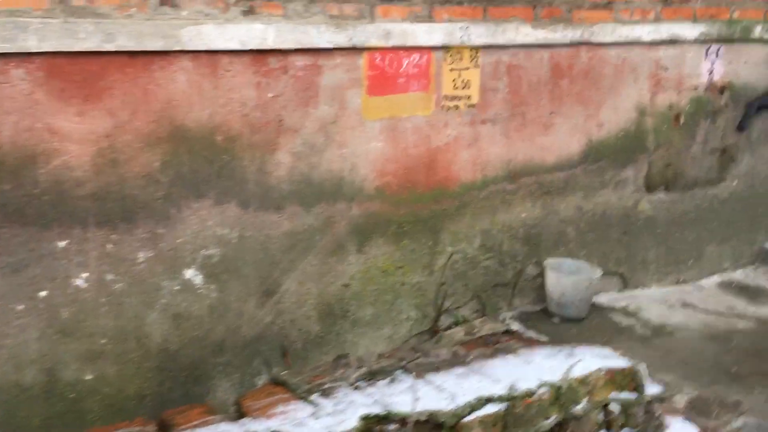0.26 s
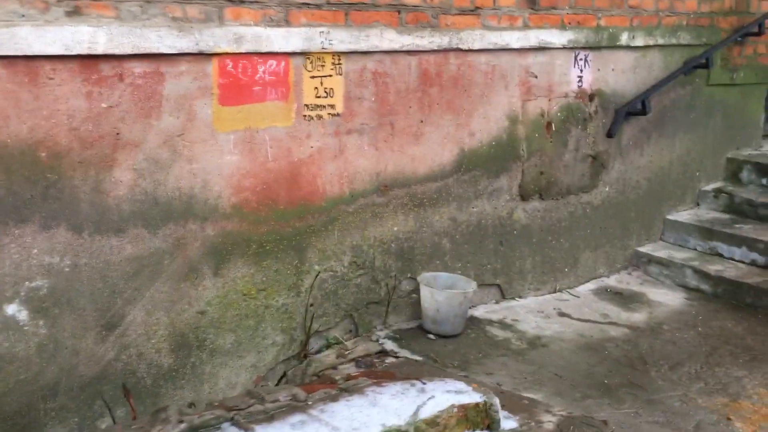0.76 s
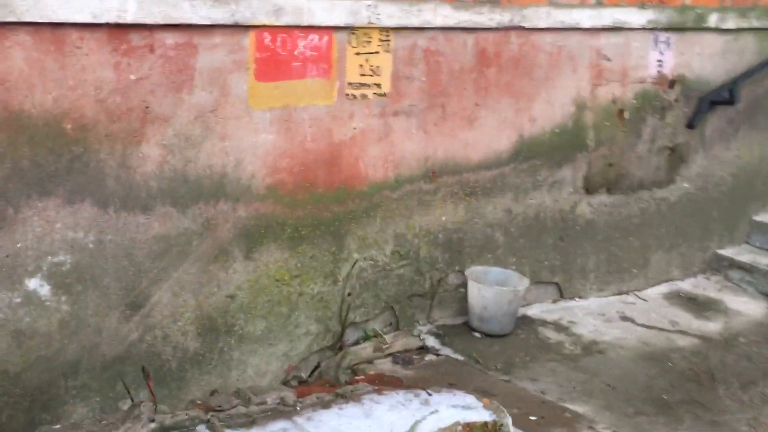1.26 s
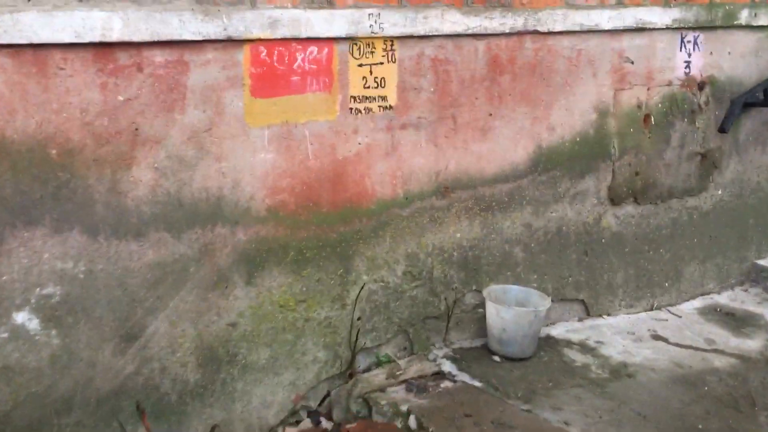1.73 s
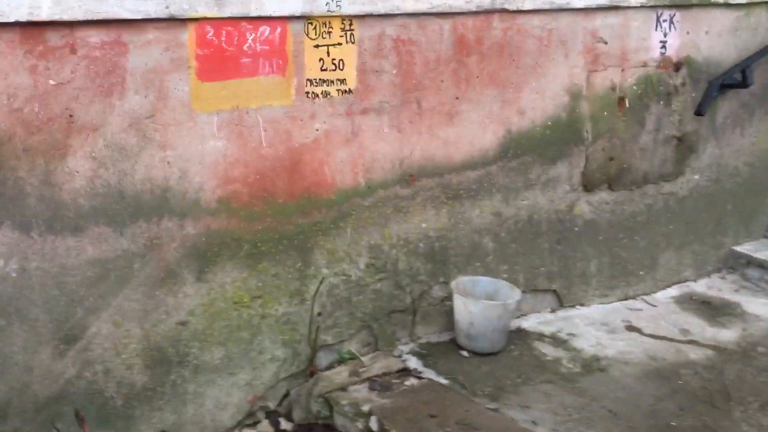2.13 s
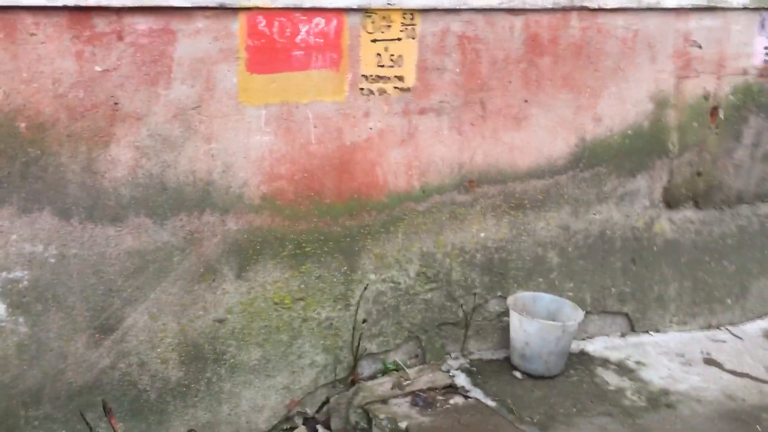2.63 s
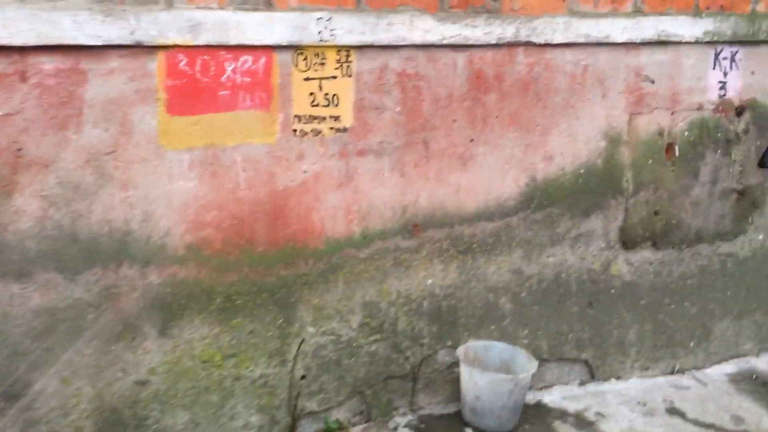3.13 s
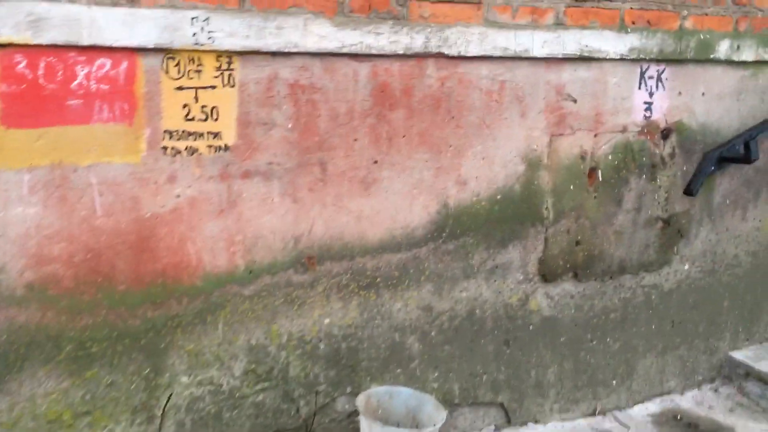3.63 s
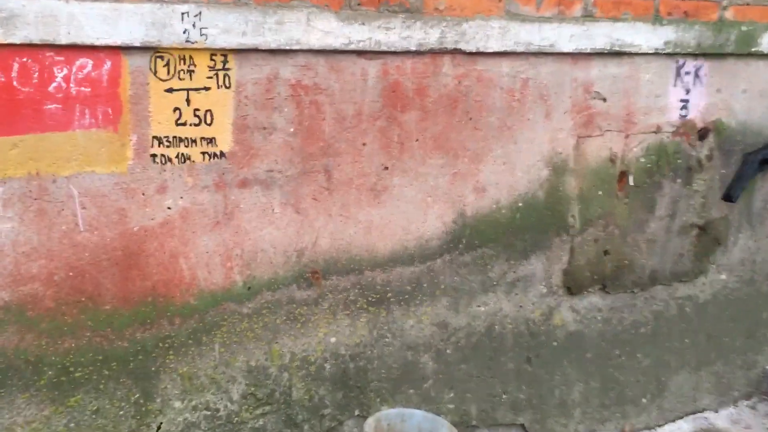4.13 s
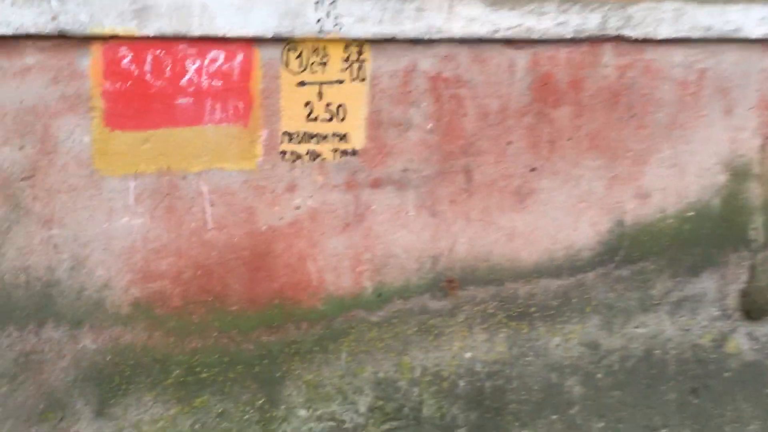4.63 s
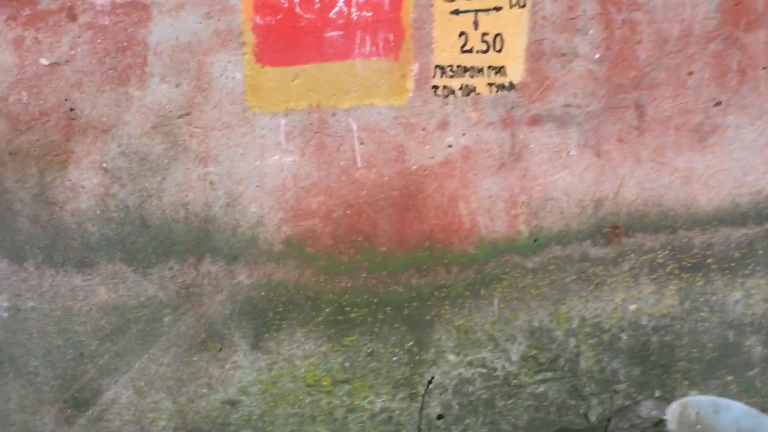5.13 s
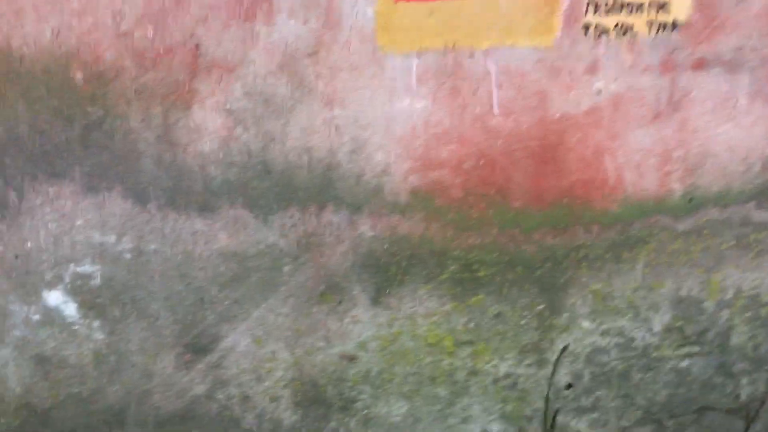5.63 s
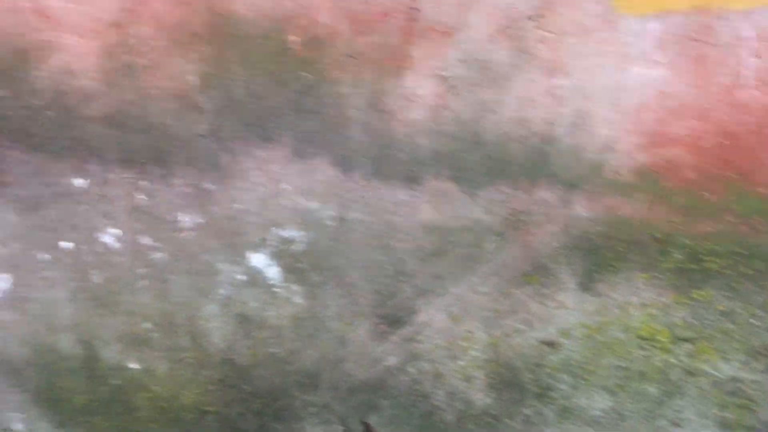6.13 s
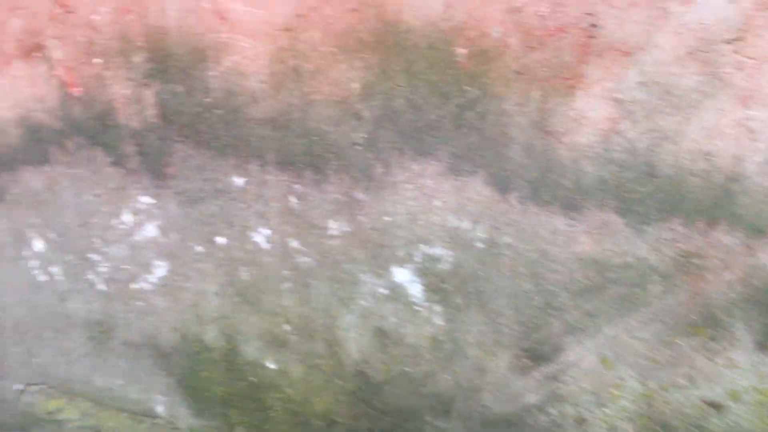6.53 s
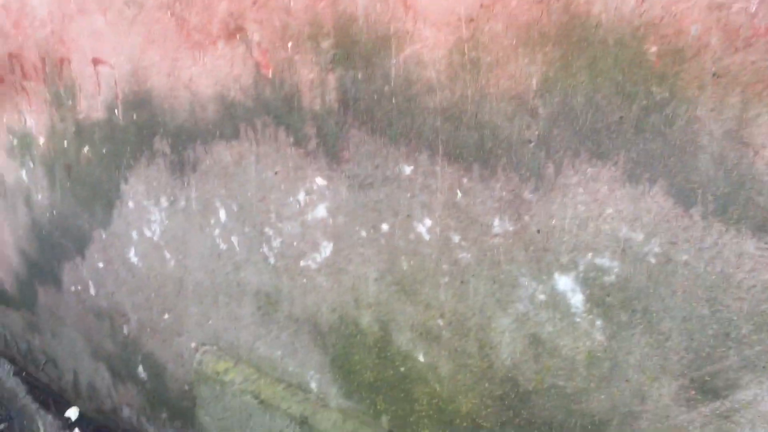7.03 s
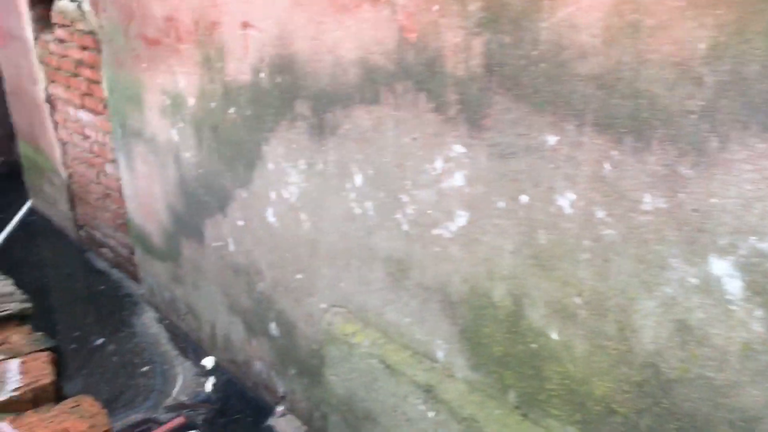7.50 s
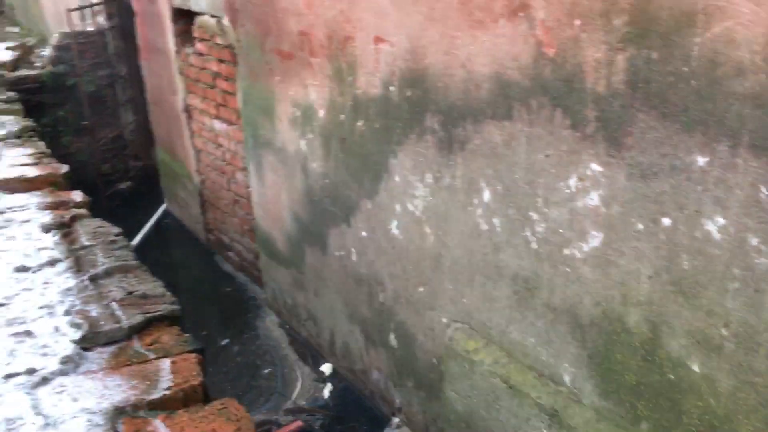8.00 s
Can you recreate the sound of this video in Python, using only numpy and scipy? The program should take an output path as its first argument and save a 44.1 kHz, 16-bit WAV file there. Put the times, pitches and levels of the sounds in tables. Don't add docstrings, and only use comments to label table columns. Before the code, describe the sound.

Close to a handheld microphone in a walled yard, boots shift on crusted snow with small dry snaps and faint scuffs. After a near pause, several firm steps crunch, with dull packed thuds and grainy crumbling. A heavy final step gives way in stages, then only tiny crumbs settle. Distant traffic rumble, faint machine hum and microphone hiss continue throughout.

```python
import sys
import numpy as np
from scipy import signal
from scipy.fft import rfft, irfft
from scipy.io import wavfile
from scipy.ndimage import uniform_filter1d

SR = 44100
rng = np.random.default_rng(int(sys.argv[2]) if len(sys.argv) > 2 else 0)


def boost(x):
    u = np.asarray(x, float) / 20
    return 10 ** u


def master_out(mix):
    frames = np.transpose(np.atleast_2d(mix))
    ceiling = np.clip(frames, -1, 1)
    pcm = np.round(ceiling * 32767).astype(np.int16)
    wavfile.write(sys.argv[1], SR, pcm)


N = 364266

CRYSTAL_HZ = np.geomspace(110, 15000, 22)

# peak time in
# seconds, peak level in dB, pitch in Hz, sharp edge in dB relative to the peak.
SHIFT_SNAPS = [(0.229, -38.5, 2450, -6), (0.246, -42, 1220, -25), (0.521, -25.5, 1390, -14.5),
               (0.5525, -33, 1350, -18), (0.602, -50, 3600, -25), (0.667, -45.5, 3130, -32),
               (0.717, -23, 1360, -12.5), (0.8252, -52, 3520, -12), (0.8436, -41, 3940, -20),
               (0.8549, -23.5, 1760, -25), (0.9355, -32, 1840, -28), (1.184, -56, 2460, 9.5),
               (1.2452, -50, 3580, -8), (1.6984, -48, 695, 2.5), (1.8205, -33, 1050, -9.5),
               (1.8406, -45, 2070, 2), (1.8598, -40.5, 1450, 4.5), (2.0961, -46, 3260, -2),
               (2.1192, -42.5, 3800, -2), (2.2832, -47, 1670, 0), (2.3287, -42, 4070, -15),
               (2.3657, -51, 2100, 13.5), (2.3916, -45, 3540, -12), (2.5646, -38.5, 4500, -11),
               (2.5793, -42, 4250, -18), (2.6043, -43, 3400, -23), (2.6329, -44, 2450, -25),
               (2.673, -35.5, 2340, 0.5), (2.7057, -44, 1980, -21)]
STEP_SNAPS = [(3.194, -29, 1110, 0), (3.2178, -23.5, 630, -1), (3.348, -34.5, 740, -25),
              (3.3988, -22, 760, -24), (3.4222, -29, 1460, 0.5), (3.484, -33.5, 1660, -1),
              (3.5141, -23.5, 787, -9), (3.541, -34, 1070, 2), (3.63, -33, 1100, -3),
              (3.6645, -40.5, 4000, -27), (3.679, -36.5, 1160, -5), (3.975, -48, 3270, -21),
              (4.078, -34.5, 2290, 5), (4.109, -36, 1110, 4), (4.1216, -32, 2940, -13), (4.2, -25, 1320, 4),
              (4.235, -26.5, 1970, -8), (4.351, -38.5, 785, 8.5), (4.3764, -35.5, 1320, 2),
              (4.4406, -42, 1690, 7), (4.4659, -33, 1610, 1), (4.481, -30, 1420, -1),
              (4.4967, -30.5, 2100, -6.5), (4.532, -38, 1140, 2), (4.5396, -32, 616, 2),
              (4.5855, -28.5, 1140, 3.5), (4.632, -31, 1020, 4), (4.6665, -25, 3240, -3),
              (4.7136, -26, 980, 4), (4.7431, -30.5, 640, 3)]
TURN_SNAPS = [(4.938, -36, 2350, -3), (5.175, -45, 3460, -15), (5.2051, -32.5, 1030, -10),
              (5.2212, -32, 1520, -2), (5.282, -34.5, 1050, 6.5), (5.394, -31, 1180, 0),
              (5.4114, -22, 800, -2), (5.4323, -28.5, 1150, -27), (5.4481, -29, 1380, -2),
              (5.4919, -24, 1080, -25), (5.5574, -36, 2090, 2), (5.577, -31.5, 2280, -22),
              (5.6416, -34, 1470, -13), (5.753, -44.5, 1950, 2), (5.955, -34.5, 1750, -3),
              (6.0565, -29, 1510, -27), (6.1224, -43, 1410, 7), (6.295, -25, 1270, -7),
              (6.406, -22, 1140, -20), (6.575, -21.5, 920, -11), (6.6368, -28.5, 2260, 4),
              (6.6964, -26.5, 1860, -20), (6.7276, -21, 595, -14), (6.7602, -23.5, 740, 1.5),
              (6.934, -41.5, 1080, 3), (7.0595, -43, 2200, 5), (7.124, -44.5, 1770, 7),
              (7.2405, -50.5, 2040, 9), (7.312, -51, 1970, 5.5), (7.4189, -31, 2710, 5.5)]
MORE_SNAPS = [(1.2583, -44, 6900, 2), (4.777, -31, 6130, 5.5), (4.9003, -43, 11900, -19),
                   (5.0295, -36, 13300, -17), (5.0451, -34, 12500, -20), (5.138, -40.5, 12660, -18),
                   (5.714, -39, 2860, 7.5), (5.8008, -37, 13800, -6), (6.038, -31, 12700, -21),
                   (6.281, -46.5, 6700, 12), (6.9796, -42, 11800, 1), (7.037, -43, 12500, -18),
                   (7.166, -47, 11000, -4), (0.9, -45, 3380, -12), (1.01, -48.5, 1440, 2),
                   (0.922, -44, 1400, -16), (2.252, -50, 2470, 5), (2.82, -51, 2520, -15), (4.729, -29, 770, 5),
                   (5.3855, -42, 1470, -4), (6.177, -46.5, 2170, 4), (7.349, -53, 2420, -14),
                   (0.2927, -64, 705, -5), (0.3122, -49, 1450, -6), (0.737, -48, 1130, 8), (0.989, -52, 1100, -9),
              (1.447, -48, 1000, -12), (1.7996, -46.5, 2030, -11), (2.415, -56, 3500, 3),
              (2.5517, -44, 2050, -6), (2.5557, -42, 4200, -9), (3.2152, -31, 1880, -2), (3.2309, -24, 740, -4),
              (3.2377, -29, 1500, -14), (3.2627, -34, 700, 2), (3.268, -36.5, 736, -8), (3.3942, -38, 734, -15),
              (3.4138, -34, 1390, 3), (3.5452, -34.5, 895, -1.5), (3.587, -46, 1400, -2),
              (3.6022, -52, 1080, -8), (3.36, -34.5, 1000, -7), (3.6868, -44, 1970, 8), (4.517, -40, 2000, -11),
              (3.7373, -44, 1680, 1), (3.7765, -49, 1970, -14), (3.9584, -49, 2180, 7.5),
              (4.0982, -38.5, 740, -14), (4.124, -31.5, 750, -20), (4.144, -48, 900, 3),
              (4.187, -27.5, 2570, -13), (4.2559, -34, 710, -6), (4.2913, -41, 1660, -11),
              (4.3596, -42, 1040, -7), (4.5107, -41, 1040, -2), (4.603, -41, 1770, -7), (4.66, -31, 3000, -13),
              (4.7173, -27, 750, 1), (4.7586, -35, 937, -9), (4.792, -33.5, 900, -13), (4.8016, -35, 3270, 6),
              (4.823, -41.5, 1940, -7),
                   (4.896, -48, 3520, -11), (4.946, -40, 2110, -12), (5.039, -37, 1990, 0),
                   (5.059, -36, 1920, -12), (5.074, -35, 1400, -13), (5.0873, -34, 950, -21),
                   (5.0994, -37, 1300, -11), (5.1484, -45, 875, 0), (5.186, -41.5, 1010, 4),
                   (5.2895, -40, 1040, -13), (5.2974, -44, 1530, -13), (5.3695, -45, 1310, -18),
                   (5.424, -44, 1010, -11), (5.47, -33, 1010, -9), (5.5022, -31, 1000, -6),
                   (5.512, -36, 1370, -11), (5.5834, -28.5, 1490, -11), (5.5964, -41, 930, -12),
                   (5.652, -37, 1170, 3), (5.681, -43, 1700, -9), (5.706, -43, 1500, 1),
                   (5.7155, -43, 720, -14), (5.855, -52.5, 2250, 1), (6.0383, -44, 1310, -5),
                   (6.0705, -37, 1500, -7), (6.076, -43, 5930, 6), (6.1829, -48, 2800, 0),
                   (6.3012, -33.5, 560, 3), (6.3102, -37, 1050, -12), (6.388, -34, 1750, -11),
                   (6.3735, -37, 1070, -9), (6.4853, -31.5, 1040, -12), (6.5752, -25, 3760, -19),
                   (6.6, -39, 875, -16), (6.625, -28, 860, -11), (6.6655, -31, 910, -5), (6.711, -24, 716, -7),
                   (6.7828, -36, 1490, -11), (6.8059, -29, 1320, -2), (6.812, -46, 1320, -5),
                   (6.8673, -40, 1270, -2), (6.899, -41, 1730, -11), (6.9442, -38, 1980, -9),
                   (6.9756, -44, 1980, -5), (7.1115, -49, 1570, -6), (7.4394, -63, 2200, -9),
                   (7.4597, -59, 1250, 9),
                   (1.0268, -50, 8500, -6), (1.511, -50, 11700, -5), (2.5794, -44, 13500, -8),
                 (5.204, -42.5, 6450, -8), (5.312, -45, 13200, -4), (5.364, -50, 12200, -10),
                 (5.4613, -33, 11400, -8), (5.5904, -58, 6310, -10), (5.877, -54, 10800, -6),
                 (6.056, -35, 14300, 4), (6.061, -42, 9200, 10), (6.9436, -59, 6200, -5),
                 (7.3796, -57, 13900, -4)]
SNAPS = SHIFT_SNAPS + STEP_SNAPS + TURN_SNAPS + MORE_SNAPS


def evened(x):
    return x / np.sqrt(np.mean(x ** 2) + 1e-20)


def read(points, hz):
    f, db = np.transpose(points)
    return np.interp(np.log(hz + 1), np.log(f), db)


def noise(points):
    hz = np.fft.rfftfreq(N, 1 / SR)
    gain = boost(read(points, hz)) * (hz > points[0][0])
    return evened(irfft(rfft(rng.standard_normal(N)) * gain, N))


def add(mix, start_s, sound):
    part = mix[max(round(start_s * SR), 0):][:len(sound)]
    part += sound[:len(part)]


def fading(x, decay_s):
    return signal.lfilter([1], [1, -np.exp(-1 / (max(decay_s, 1e-4) * SR))], x)


def pop(hz, turns, sag=0):
    u = np.arange(int(4 * turns * SR / hz)) * hz / SR / turns
    envelope = u ** 3 * np.exp(-4.5 * u)
    phase = u + sag * (1 - np.exp(-2 * u) - u / 2)
    swing = envelope * np.sin(2 * np.pi * turns * phase)
    return swing / abs(swing).max()


def near(hz, octaves):
    share = np.exp(-.5 * (np.log2(CRYSTAL_HZ[:, None] / hz) / octaves) ** 2)
    return share / np.sqrt((share ** 2).sum(0))


def around(s, length_s):
    at = np.arange(max(round((s - .15) * SR), 0), min(round((s + length_s + .45) * SR), N))
    return slice(at[0], at[-1] + 1), at / SR - s


def traffic():
    # time in seconds, nearness in dB, heavy engine load in dB.
    swells = [(0, 2, 3), (.4, 4.5, -2.5), (.9, 2, 0.5), (1.3, 3, 4.5), (2.0, 8.5, -4.5), (2.8, 8, -1.5),
              (3.3, -3, -3.5), (3.6, 8, -10), (4.1, 7.5, -10), (4.7, -6, -5), (5.1, 7.5, -8.5),
              (5.9, 1.5, -3), (6.3, 4, -2), (6.7, -11, -7), (7.2, -0.5, -3), (7.7, -0.5, -3),
              (8.26, -1.5, -1.5)]
    # frequency in Hz, level in dB per Hz.
    rumble = [(12, -31), (22, -14), (36, 1), (48, 8.5), (59, 8.5), (72, 4), (100, 3), (130, -15)]
    wash = [(90, -22.5), (135, -3.5), (210, -10), (320, -12), (480, -18.5), (930, -23.5), (2500, -31),
            (6000, -37.5), (16000, -45.5)]
    t = np.arange(N) / SR
    s, near_points_db, load_points_db = np.transpose(swells)
    near_db = np.interp(t, s, near_points_db)
    load_db = np.interp(t, s, load_points_db)
    out = boost(-57.5 + 0.66 * load_db) * noise(rumble + [(170, -46)])
    return out + boost(-63 + 0.57 * near_db + 1.4 * wavering(1)[0]) * noise(wash)


def wavering(count):
    drift = uniform_filter1d(rng.standard_normal((count, N)), 4000, 1)
    return evened(uniform_filter1d(drift, 2000, 1))


def hum():
    # frequency in Hz, level in dB.
    lines = [(31, -89), (59, -61), (151, -65.5), (255, -73)]
    # time in seconds, level in dB.
    nearness = [(0, 4.5), (4.5, -3.5), (6.5, -2.5)]
    t = np.arange(N) / SR
    near_db = np.interp(t, *np.transpose(nearness))
    waver = wavering(8)
    out = np.zeros(N)
    for k, (hz, db) in enumerate(lines):
        turns = np.cumsum(hz + 1.214 * waver[k]) / SR
        level = boost(db + 1.5 + near_db + 1.5 * waver[k + 4])
        out += level * np.sin(2 * np.pi * turns)
    return out


def hiss():
    # frequency in Hz, level in dB per Hz.
    spectrum = [(1000, -34), (5000, 2), (11000, 9.5), (16000, -39)]
    return boost(-81.5) * noise(spectrum)


def yard(x):
    # delay in seconds, level in dB.
    wall = [
        (.0055, -14),
        (.012, -19),
        (.0225, -18),
    ]
    t = np.arange(SR // 4) / SR
    tail = rng.standard_normal(len(t)) * boost(-60 * t / .16) * (t > .003)
    echo = boost(-21.0) * tail / np.linalg.norm(tail)
    for s, db in wall:
        smear = rng.standard_normal(120) * np.exp(-np.arange(120) / 40)
        add(echo, s, boost(db) * smear / np.linalg.norm(smear))
    dull = signal.lfilter([.6], [1, -.4], echo)
    return x + signal.oaconvolve(x, dull)[:N]


def blows(events):
    out = np.zeros(N)
    for s, db, hz in events:
        add(out, s - 1.447 / hz, boost(db - 7.5) * pop(hz, turns=1.52))
    return out


def jolts():
    # time in seconds, peak level in dB, pitch in Hz.
    knocks = [
        (0.2954, -33.5, 196),
        (5.623, -34, 59),
        (5.691, -30.5, 62),
        (5.946, -32, 53.4),
        (6.022, -34, 46.3),
    ]
    return blows(knocks)


def thuds():
    # time in seconds, peak level in dB, pitch in Hz.
    lumps = [(3.218, -22, 320), (3.196, -27.5, 417), (3.227, -33, 143), (5.285, -28, 300),
             (6.042, -34, 430), (4.165, -22, 290), (4.201, -22, 222), (4.238, -27.5, 152),
             (4.357, -25.5, 230), (4.637, -23.5, 262), (4.732, -28, 286), (4.763, -25, 156),
             (4.784, -26.5, 172), (5.21, -28, 256), (5.2647, -27.5, 218), (5.415, -24, 246),
             (6.287, -27, 265), (6.411, -19.5, 337), (6.431, -22, 480), (6.45, -27, 336), (6.482, -23, 450),
             (6.492, -25, 380), (4.176, -24, 300), (6.5447, -14.5, 320), (6.548, -9.5, 320),
             (6.579, -16, 293), (6.6, -21, 410), (6.618, -17, 238), (6.645, -27, 178), (6.66, -17, 305),
             (6.676, -19, 320), (6.696, -30, 298), (6.716, -19.5, 326), (6.7309, -21, 346),
             (6.7632, -17, 364), (6.781, -24, 310)]
    return blows(lumps)


def chirps():
    # peak time in seconds, peak level in dB, pitch in Hz.
    slabs = [(0.8608, -41, 1650), (0.867, -45, 1650), (.877, -49, 1700), (0.886, -49, 1670),
             (.9575, -54, 1700), (.966, -59, 1750), (1.388, -58, 1900), (1.397, -55, 2100),
             (1.14, -55.5, 1900), (3.226, -32.5, 637), (3.404, -30.5, 712), (3.43, -45, 760),
             (3.522, -42, 770), (6.613, -35, 2350), (7.06, -52, 2320)]
    out = np.zeros(N)
    for s, db, hz in slabs:
        add(out, s - 5.33 / hz, boost(db) * pop(hz, turns=7.1))
    return out


def press(hold_s, t):
    load_db_per_s, sag_db_per_s, lift_db_per_s = 829, 25, 420
    trickle_db, trickle_db_per_s = -14.5, 53
    after = np.maximum(t - hold_s, 0)
    rise_db = load_db_per_s * t * (1 - t / .03)
    lift_db = np.maximum(-lift_db_per_s * after, trickle_db - trickle_db_per_s * after)
    return boost(np.where(t < 0, rise_db, lift_db - sag_db_per_s * np.minimum(t, hold_s)))


def tread_strain(fine):
    # full load time in seconds, hold in seconds, crumble in dB,
    # deep packing in dB relative, ice fizz in dB relative.
    presses = [(3.221, 0.014, -40.5, -7, -4.5), (3.366, 0.014, -42, -21, -13),
               (3.398, 0.021, -41.5, -11, -9), (3.501, 0.027, -45, -29, -11), (3.647, 0.087, -66, -29, -1),
               (4.093, 0.026, -52.5, -22, -2), (4.159, 0.045, -39.5, -1, -6), (4.214, 0.044, -42.5, -7, -7),
               (4.355, 0.042, -54, 6.5, -5.5), (4.459, 0.15, -56.5, 0, -8), (4.57, 0.15, -51, 1.5, -4.5),
               (4.727, 0.073, -42.5, -1, -4), (4.936, 0.0058, -66.5, -19, 13.5),
               (5.034, 0.053, -46, 2.5, -9), (5.208, 0.058, -51.5, 3, -2), (5.412, 0.019, -44, -1, -6.5),
               (5.46, 0.029, -48.5, 1.5, -12), (5.589, 0.0067, -41.5, -8, -6.5),
               (5.552, 0.022, -47, -3.5, -4.5), (5.48, 0.04, -47.5, -14, -4),
               (5.633, 0.095, -59.5, 6.5, 1.5), (6.039, 0.053, -53.5, 1, -1.5),
               (3.193, 0.0026, -45.5, -1, -6), (3.73, 0.0098, -57, -19, -9), (5.157, 0.0092, -61, -10, -5),
               (5.276, 0.0047, -55.5, 12.5, -2.5)]
    heavy_step = [(6.288, 0.0063, -44.5, 0.5, 3), (6.333, 0.087, -42.5, -3, -5.5),
                  (6.401, 0.027, -37, 1.5, -4), (6.427, 0.088, -41.5, 1, -6.5),
                  (6.53, 0.0052, -33, -8, -6.5), (6.57, 0.0068, -40, 1, -6), (6.6, 0.13, -38.5, 4, -8),
                  (6.661, 0.012, -36, -3, -7.5), (6.755, 0.005, -36, 3.5, -7),
                  (6.772, 0.032, -44.5, -9, -5), (6.835, 0.048, -56.5, -5, -3.5),
                  (6.928, 0.074, -58, -12, -3.5), (6.988, 0.25, -64, 3, 0.5)]
    # frequency in Hz, level in dB per Hz.
    grains = [(110, 2), (170, 3), (300, 1.5), (450, -5.5), (600, -10.5), (880, -12.5), (2400, -19),
              (5000, -27), (9000, -26.5), (16000, -31)]
    tread = np.zeros((len(CRYSTAL_HZ), N))
    colour = boost(read(grains, CRYSTAL_HZ)) * np.sqrt(CRYSTAL_HZ)
    deep = CRYSTAL_HZ < 520
    for sizes in (deep, ~deep & ~fine, fine):
        colour[sizes] /= np.linalg.norm(colour[sizes])
    for s, hold_s, db, deep_db, fizz_db in presses + heavy_step:
        span, t = around(s, hold_s)
        level = colour * boost(db + deep * deep_db + fine * fizz_db)
        tread[:, span] = np.maximum(tread[:, span], np.outer(level, press(hold_s, t)))
    return tread


def brush_strain():
    # loudest time in seconds, level in dB, crystal pitch in Hz, fade in dB per second.
    scuffs = [
        (.01, -62.5, 2450, 111),
        (0.241, -58.5, 1350, 93),
        (1.0, -70, 2570, 2),
        (1.448, -59, 1300, 149),
        (2.372, -64, 2780, 131),
        (2.558, -57.5, 2950, 142),
        (1.415, -71, 2200, 90),
        (3.98, -64.5, 2610, 286),
    ]
    swell_ratio = 3.7
    brush = np.zeros((len(CRYSTAL_HZ), N))
    for s, db, hz, fade_db_per_s in scuffs:
        span, t = around(s, 0)
        level_db = db - 5.0 - fade_db_per_s * np.maximum(t, -swell_ratio * t)
        brush[:, span] += boost(level_db) * near(hz, octaves=1.56)
    return brush


def strain():
    fine = CRYSTAL_HZ > 3500
    slides = np.zeros((len(CRYSTAL_HZ), N))
    for s, db, hz, edge_db in SNAPS:
        share = near(min(hz, 4500), octaves=1.0)[:, 0] + fine * boost(edge_db - 21.0)
        slides[:, round(s * SR)] += boost(-53 + 0.59 * (db + 34.0)) * share
    brush = brush_strain()
    return tread_strain(fine) + 0.5 * brush, fading(slides, 0.0043) + 1.35 * brush


def crumble():
    tread, slides = strain()
    starts = boost(5.5 * np.minimum(rng.exponential(1, (3, N)), 2.2)) * (rng.random((3, N)) < 170 / SR)
    for s, db, hz, edge_db in SNAPS:
        starts[:, round(s * SR)] += boost(13.5 + 0.68 * (db + 33))
    weight = uniform_filter1d(np.linalg.norm(tread, axis=0), 16000) / boost(-40.0)
    even = 0.45 + 4.5 * weight ** 2
    cracks = even + evened(fading(starts, 0.0018))
    cracks /= np.sqrt(uniform_filter1d(cracks ** 2, 2500))
    fronts = evened(starts) / (1 + even)
    out = np.zeros(N)
    for k, hz in enumerate(CRYSTAL_HZ):
        odds = rng.random(N) / (10.0 * hz ** .6 / SR)
        at = np.flatnonzero(odds < 1)
        breaks = np.zeros(N)
        breaks[at] = boost(3.5 * np.minimum(-np.log(odds[at] + 1e-9), 4)) * (-1.) ** at
        group = 1 + k // 3 % 2
        clumps = 0.59 * cracks[0] + 0.24 * cracks[group]
        alone = evened(breaks) * (clumps * tread[k] + slides[k])
        together = .17 * (fronts[0] - fronts[group]) * (hz > 500) * tread[k]
        force = alone + (-1) ** k * together
        grain = pop(hz, turns=2.53)
        out += signal.oaconvolve(force, grain / np.linalg.norm(grain))[:N]
    return out


def snaps():
    ring_db, ring_swings = -34.5, 156
    out, edges = np.zeros(N), np.zeros((2, N))
    t = np.arange(SR // 10) / SR
    for s, db, hz, edge_db in SNAPS:
        softness = 1 + 0.03 * max(-25.0 - db, 0)
        swings = 1.073 * (hz / 1000) ** 0.3 * softness
        add(out, s - 0.82 * swings / hz, boost(db) * pop(hz, swings, sag=0.33))
        add(out, s, boost(db + ring_db - 60 * t * hz / ring_swings) * np.sin(2 * np.pi * hz * t))
        add(edges[int(hz > 5000)], s - .0004, boost([db + edge_db]))
    thick = noise([(700, 8.0), (2200, 9.5), (4000, 7.0), (7000, 2.5), (11000, 1.5), (16000, -10.0)])
    thin = noise([(4000, -18.0), (9000, 19.0), (16000, -3.0)])
    return out + boost(-7.0) * (fading(edges, 0.00091) * [thick, thin]).sum(0)


def scene():
    background = traffic() + hum() + hiss()
    boots = jolts() + thuds() + chirps() + crumble() + snaps()
    return (yard(boots) + background)[None]


def low_pass(x):
    return signal.sosfilt(signal.butter(12, 16810, fs=SR, output="sos"), x)


def record(dry):
    # frequency in Hz, width in Hz, depth in dB.
    mic_dips = [(4800, 350, -2.5), (7690, 470, -3.5), (10360, 560, -5)]
    hz = np.fft.rfftfreq(N, 1 / SR)
    colour_db = sum(db / (1 + ((hz - f) / width) ** 2) for f, width, db in mic_dips)
    colour_db = colour_db - 42 * np.clip((hz - 15750) / 150, 0, 1) - 60 * (hz > 16700)
    mix = irfft(rfft(dry) * boost(colour_db), N)
    return low_pass(mix)


dry = scene()
out = record(dry)
master_out(out)
```